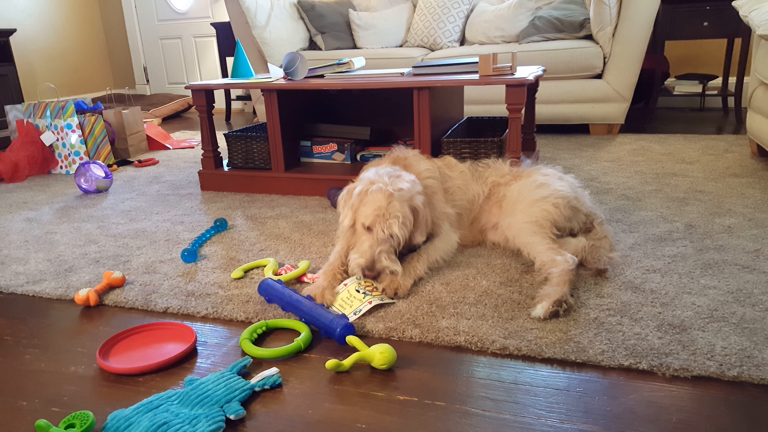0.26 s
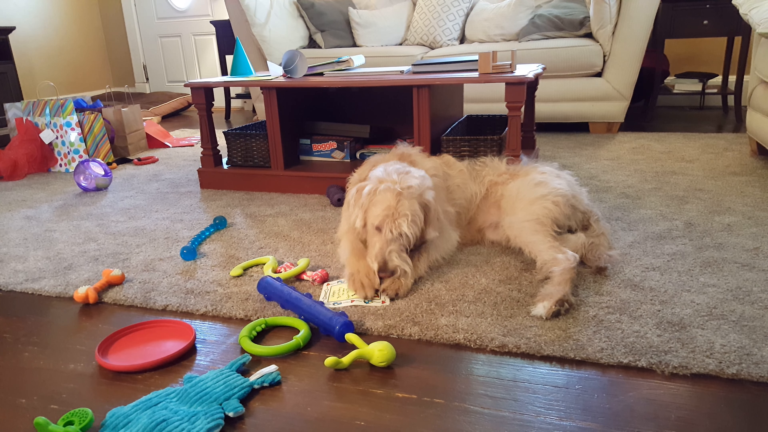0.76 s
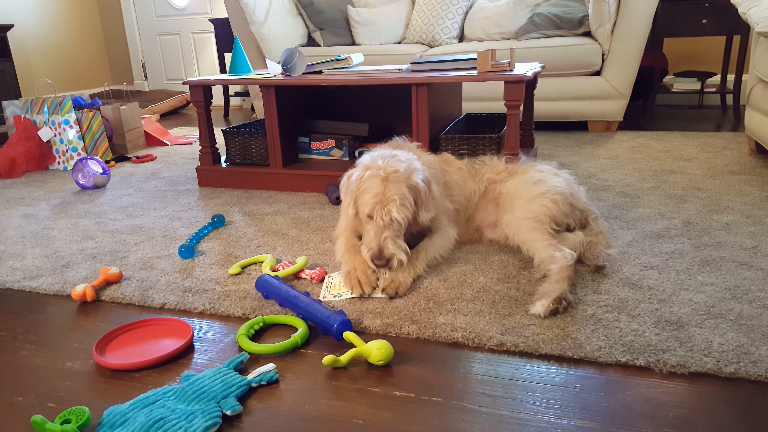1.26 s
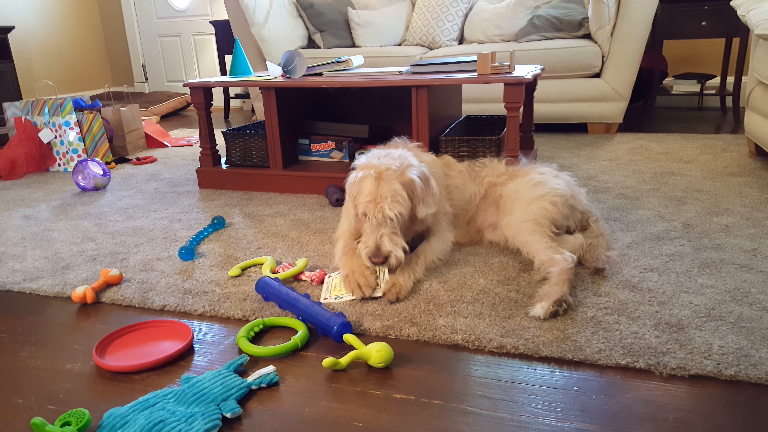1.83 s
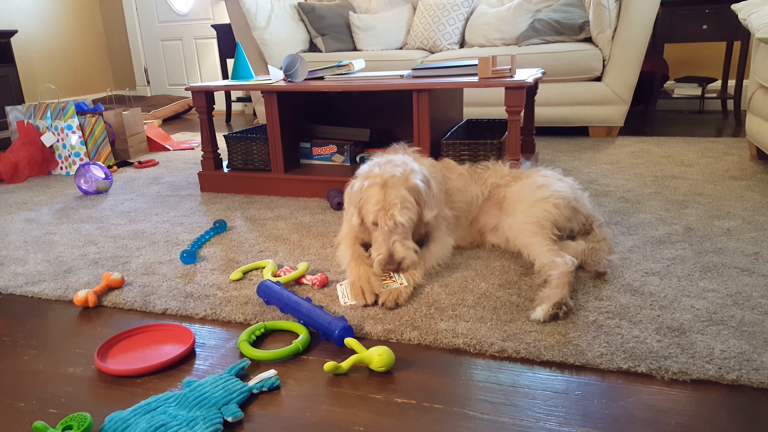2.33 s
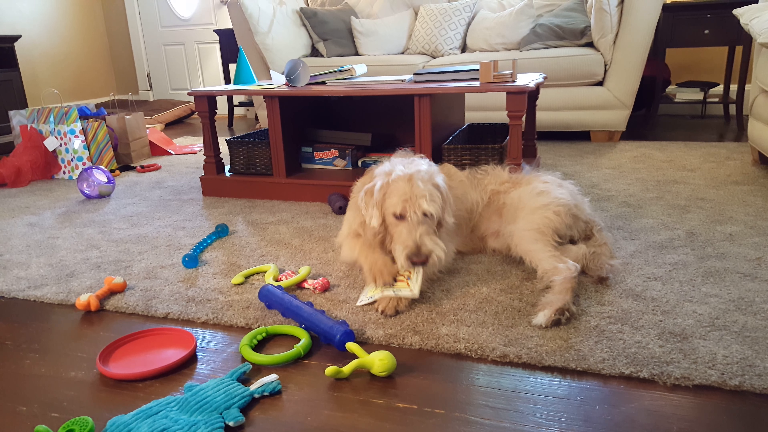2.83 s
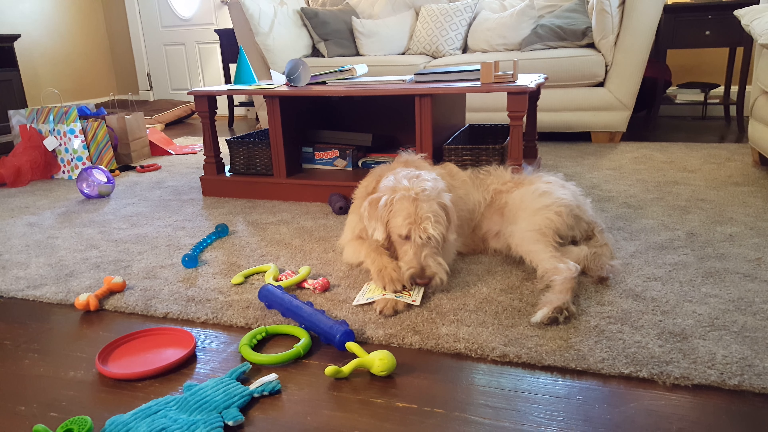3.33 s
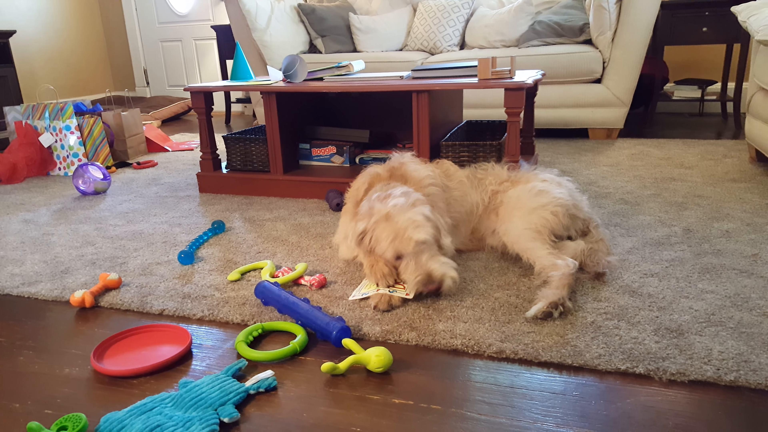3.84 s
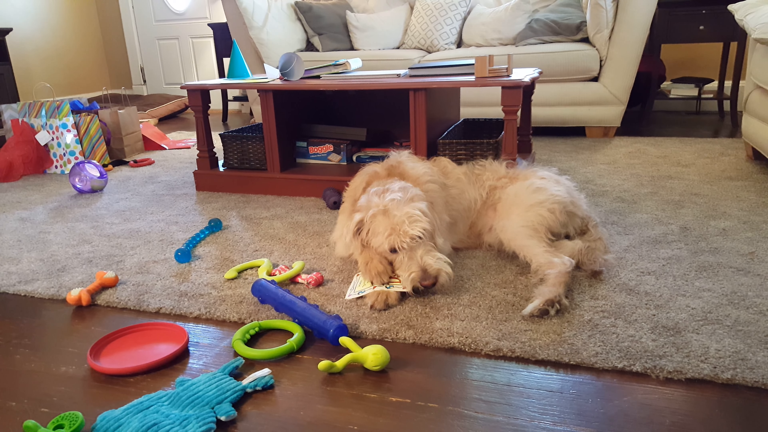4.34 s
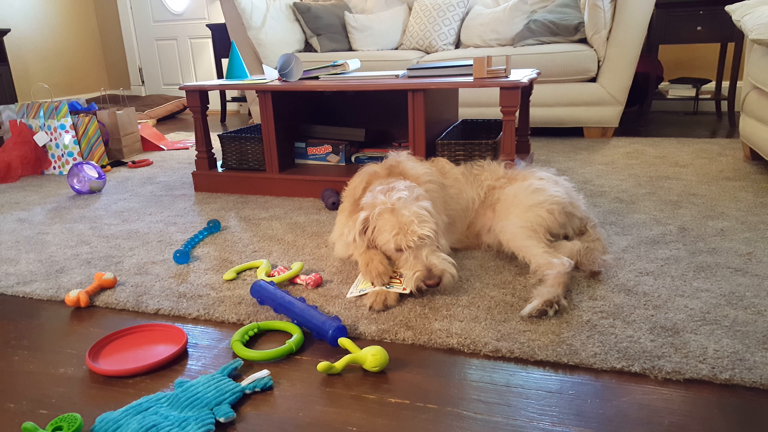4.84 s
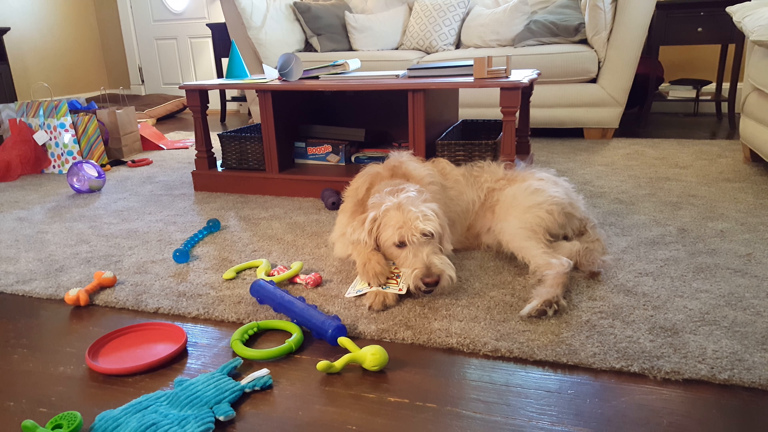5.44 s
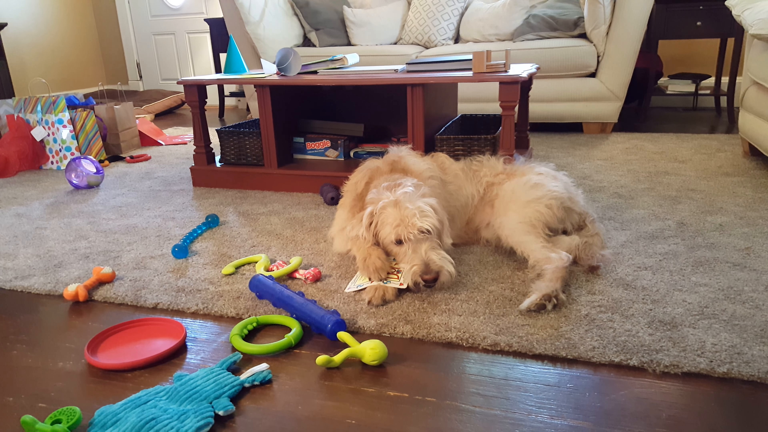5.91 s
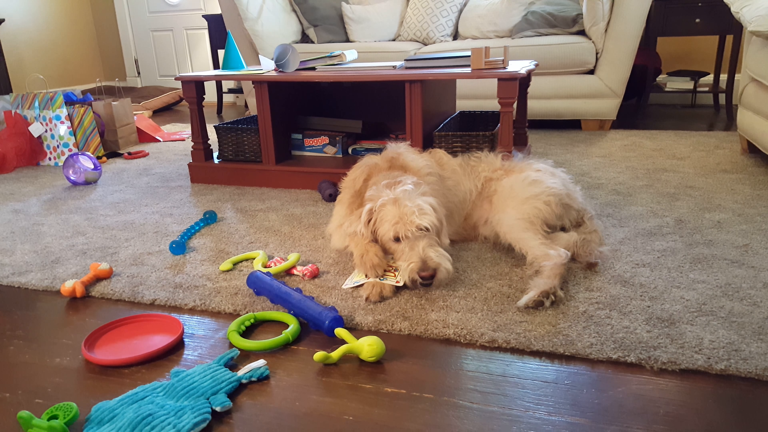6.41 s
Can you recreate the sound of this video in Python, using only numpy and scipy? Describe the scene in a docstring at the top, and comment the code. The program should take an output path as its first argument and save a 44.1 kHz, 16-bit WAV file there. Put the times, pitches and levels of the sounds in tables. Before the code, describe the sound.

Indoors, a dog on a rug works at a stiff paper card, heard slightly left in a small, soft room with short reflections. Muffled outside engines drone low throughout, wavering, over faint room air, left-heavy hiss and a barely audible appliance hum. For the first half second there is little but drone and a tiny wet tick. Crumples and a sharp snap come at 0.5-0.8, with weaker snaps around 1.0-1.1. A low rev climbs from 1.3 and pulses near 1.7 and 2.0. At 2.0 the loudest crack and crumple bursts out. After a lull, crunchy rustles cluster at 2.7-3.1 under a higher engine note. Engine notes waver lower at 3.4-4.7. From 3.9 to the end at about 6.7, small dry snaps, short crinkles and thin lip ticks come irregularly, closer together after 5.4, as the drone dips, then returns near 6.

```python
"""In a living room, a dog lies on a rug, crumpling, snapping and chewing a paper card.
The card is made of thousands of tiny random creases, sharp cracks with short rings, and thin wet mouth ticks.
Small engines outside drone through the walls and stir the room's low modes; an appliance hums faintly.
These are sine tones and ringing noise. Two microphone ports listen over a bed of air and hiss:
the left port lifts the upper middle of the sounds from the dog, and its own hiss is stronger there too."""
import sys
import numpy as np
from scipy import signal
from scipy.fft import rfft, irfft
from scipy.io import wavfile

SR = 44100
rng = np.random.default_rng(int(sys.argv[2]) if len(sys.argv) > 2 else 0)


def file_out(sig):
    """Save sig as 16-bit WAV at sys.argv[1]."""
    # one column per channel
    cols = np.atleast_2d(sig).T
    # limit, then scale
    lim = np.clip(cols, -1, 1)
    pcm = np.round(lim * 32767).astype(np.int16)
    wavfile.write(sys.argv[1], SR, pcm)


N = 294147   # length in samples


def amp(db):
    """Decibels to gain."""
    return 10 ** (np.asarray(db) / 20)


def rms_one(x):
    """Scale a sound to an rms (average strength) of 1."""
    return x / np.sqrt(np.mean(x ** 2) + 1e-20)


def in_time(rows):
    """Draw straight lines between the rows of a table: one curve per column, one value per sample."""
    s, *columns = np.transpose(rows)
    return [np.interp(np.arange(N) / SR, s, column) for column in columns]


def at_hz(points, hz):
    """Read a table of pitch and value at any pitch, on a log-frequency axis."""
    table_hz, values = np.array(points).T
    return np.interp(np.log(hz + 1), np.log(table_hz), values)


def colour(x, points):
    """Give a sound the dB spectrum of a table, with a filter that never sounds early (minimum phase)."""
    log_gain = np.log(amp(at_hz(points, np.linspace(0, SR / 2, 1025))))
    cepstrum = irfft(log_gain)
    # folding the second half onto the first makes the filter causal
    cepstrum[1:1024] *= 2
    cepstrum[1025:] = 0
    response = irfft(np.exp(rfft(cepstrum)))
    return signal.oaconvolve(x, response)[:N]


def drift(rate_hz):
    """Slow random wandering around 0 with a spread of about 1."""
    r = np.exp(-80 * np.pi * rate_hz / SR)   # made at one value every 40 samples
    noise = rng.standard_normal(N // 40 + 2002)
    slow = signal.lfilter([1], [1, -2 * r, r * r], noise)[2000:]   # skip the filter's start
    return np.interp(np.arange(N) / 40, np.arange(len(slow)), rms_one(slow))


def resonance(x, hz, width_hz):
    """Two-pole band-pass: sound near one pitch rings on, with a gain of 1 at the top."""
    r = np.exp(-np.pi * width_hz / SR)
    gain = (1 - r * r) / 2
    return signal.lfilter(np.array([1, 0, -1]) * gain, [1, -2 * r * np.cos(2 * np.pi * hz / SR), r * r], x)


def butter_filter(x, order, hz, kind):
    """Keep only the low, high or middle part of a sound."""
    return signal.sosfilt(signal.butter(order, hz, kind, fs=SR, output="sos"), x)


def panned(x, db):
    """Mono to left and right, with the left louder by this many dB."""
    return x * amp([[db / 2], [-db / 2]])


def tone(hz, db, waver_db):
    """A sine that follows a pitch curve while its level wavers."""
    phase = 2 * np.pi * np.cumsum(hz) / SR + rng.uniform(0, 2 * np.pi)
    return np.sqrt(2) * amp(db + waver_db * drift(8.2)) * np.sin(phase)   # sqrt(2): db counts as rms


def swells(peak_s, rise_s, fall_s, db):
    """Bell-shaped swells, each with its own rise and fall, summed in power."""
    power = np.zeros(N)
    for peak, rise, fall, gain in zip(peak_s, rise_s, fall_s, amp(db)):
        first = max(0, round((peak - 4 * rise) * SR))
        last = min(N, round((peak + 4 * fall) * SR))
        near = np.arange(first, last)
        since = near / SR - peak
        power[near] += gain ** 2 * np.exp(-(since / np.where(since < 0, rise, fall)) ** 2)
    return np.sqrt(power)


# Tone colour of the air and hiss, as a relative spectrum: pitch_hz, level_db
AIR_COLOUR = [(15, -31), (25, -17), (43, -16), (86, -4.5), (140, -1.5), (247, -17), (283, -9.5), (370, -10),
              (602, -22.5), (1030, -15.5), (1590, -19.5), (2510, -8.5), (4300, -28), (9660, -40),
              (15700, -37)]
# How much stronger the left port is than the right: pitch_hz, difference_db
AIR_BALANCE = [(30, -6), (60, 4), (110, -3), (200, 10), (380, -0.5), (700, 12.5), (1290, 12.5),
               (2380, 24.5), (4400, 7.5), (8120, 2), (15000, -1.5)]
# How alike the two ports are; 1 is the same, and 0 or less is played as unrelated: pitch_hz, likeness
AIR_LIKENESS = [(60, 0), (130, 1.3), (290, 0.9), (640, 0.68), (1410, -0.27), (3100, -0.08), (6820, -0.44),
                (15000, 0)]
AIR_LEVEL_DB = -60.5   # of the two ports averaged, counted above 250 Hz


def air_and_hiss(patchy_db=0.32):
    """Room air is noise shared by both ports; hiss is noise that each port has on its own."""
    hz = np.fft.rfftfreq(N, 1 / SR)
    common, left, right = rfft(rng.standard_normal((3, N)))
    alike = np.clip(at_hz(AIR_LIKENESS, hz), 0, 1)
    pan_db = at_hz(AIR_BALANCE, hz) / 2 * [[1], [-1]]
    both = np.sqrt(alike) * common + np.sqrt(1 - alike) * np.array([left, right])
    both = both * amp(pan_db)
    # divide out a level for the sum of both ports
    mid = np.sqrt(np.mean(amp(2 * pan_db), axis=0) / 2 + np.sqrt(alike) * alike / 2)
    noise = irfft(both * amp(at_hz(AIR_COLOUR, hz)) / mid, N)
    above_bass = irfft(rfft(noise.mean(axis=0)) * (hz > 250), N)
    return amp(AIR_LEVEL_DB + patchy_db * drift(15)) * noise / np.std(above_bass)


# Steady note of the appliance: pitch_hz, level_db (rms around which it wavers, before panning)
HUM_TONES = [(236.9, -72.5)]


def appliance_hum():
    """A faint sine at a fixed pitch, wavering slightly in level."""
    return sum(tone(np.full(N, hz), db, waver_db=0.42) for hz, db in HUM_TONES)


# Overtones of the steady engine: multiple of the firing rate, level_db (against the engine)
ENGINE_ORDERS = [(1, -23), (2, -0.5), (3, -9.5), (4, -16)]
# Notes of the revving engine, one list for each stretch that is heard: time_s, pitch_hz, level_db
REV_STRETCHES = [
    [(0.5, 120.0, -61), (0.7, 119.4, -58), (0.95, 119, -57)],
    [(1.3, 98.5, -63), (1.6, 118.8, -56), (1.7, 133.3, -44), (1.88, 135.4, -79), (1.98, 135.6, -43.5),
     (2.2, 138.2, -69)],
    [(2.56, 168.8, -61.5), (2.85, 166, -64), (3.1, 171, -55.5), (3.36, 169.6, -58.5)],
    [(3.41, 110.5, -52), (3.74, 124.1, -58), (4.1, 117, -51.5), (4.22, 137.6, -52), (4.3, 142.7, -71),
     (4.43, 143, -51), (4.75, 103, -67)],
]
# Low notes at which the room rings: pitch_hz, width_hz, level_db (added to the drone curves below)
LOW_MODES = [(91.5, 37, 7), (135.54, 2.8, -1.5), (180, 34, -1)]
# Strength of the drone: time_s, steady_engine_db, broad_rumble_db, upper_room_mode_db
DRONE_LEVELS = [(0.0, -56, -67.5, -59), (0.97, -57, -74, -60.5), (1.49, -61.5, -67.5, -62.5),
                (2.01, -55, -58, -47), (2.23, -69, -71.5, -60), (2.69, -67.5, -81, -74),
                (3.01, -56.5, -76, -58), (3.19, -62.5, -68, -77), (3.29, -52, -64, -54),
                (3.53, -51, -65, -57), (3.6, -58.5, -66, -60.5), (4.01, -56.5, -73, -64),
                (4.23, -51, -56.5, -47.5), (4.98, -66, -82.5, -72), (5.74, -70.5, -69, -67),
                (5.98, -51.5, -73, -55), (6.54, -51, -65, -66), (6.67, -51, -66, -69)]
SECOND_ORDER_HZ, WANDER_HZ = 97.3, 0.816   # steady engine's second order, and how far it strays


def engines():
    """Firing pulses make a stack of sines, revs make a gliding note, and rumble rings in the room's modes."""
    steady_db, rumble_db, upper_db = in_time(DRONE_LEVELS)
    firing_hz = (SECOND_ORDER_HZ + WANDER_HZ * drift(1.59)) / 2
    out = sum(tone(k * firing_hz, steady_db + order_db, waver_db=1.27) for k, order_db in ENGINE_ORDERS)
    for rows in REV_STRETCHES:
        (start_s, first_hz, _), (end_s, last_hz, _) = rows[0], rows[-1]
        fade_in = (start_s - 0.1, first_hz, -100)
        fade_out = (end_s + 0.033, last_hz, -100)
        out = out + tone(*in_time([fade_in, *rows, fade_out]), waver_db=2.7)
    for db, (hz, width_hz, mode_db) in zip((rumble_db, upper_db, rumble_db), LOW_MODES):
        ringing = resonance(rng.standard_normal(N), hz, width_hz)
        ringing = resonance(ringing, hz, 2.1 * width_hz)
        out = out + amp(db + mode_db) * rms_one(ringing)
    return out


# Thin wet ticks of lips and tongue: start_s, click_db (height of the click before its resonance)
MOUTH_TICKS = [(0.038, -64), (2.318, -60), (3.3672, -56), (3.895, -55), (4.181, -59), (4.632, -64),
               (4.6786, -63), (4.8294, -63), (5.4564, -54), (5.4759, -54), (5.7019, -60), (6.1234, -66),
               (6.2127, -60)]


def mouth_ticks(hz=11500, width_hz=5000):
    """Each tick is a one-sample click through a wide, high resonance, applied twice."""
    clicks = np.zeros(N)
    for s, db in MOUTH_TICKS:
        clicks[round(s * SR)] = amp(db)
    ringing = resonance(resonance(clicks, hz, width_hz), hz, width_hz)
    return panned(6 * ringing, 0.1)


# Body of the rustle, as a relative spectrum: pitch_hz, level_db
CARD_BODY = [(350, -32), (600, -29), (841, -6), (1280, -8), (2140, -3), (3160, -2), (4500, -20.5),
             (5850, -61), (9900, -120)]
# Treble of the rustle, as a relative spectrum: pitch_hz, level_db
CARD_CRISP = [(2060, -35), (3500, -8), (3660, 2.5), (6440, 1.5), (9500, -12), (12400, -56), (20900, -120)]
# Crumples and snuffles at the card, plus two swells right after the loudest snaps # (tilt is upper body against
# lower body): # peak_s, length_s, body_db, tilt_db, treble_db, bulk_db
CRUMPLES = [ (0.507, 0.034, -59.5, 1, -58.5, -74), (0.684, 0.04, -50, -15.5, -61, -64),
            (0.764, 0.056, -60, -11, -67, -64), (0.826, 0.032, -54, -16.5, -61.5, -64),
            (1.04, 0.032, -72, -9, -72, -67), (1.153, 0.13, -72, -7, -79, -75),
            (2.001, 0.041, -42, -4.5, -56, -58), (2.658, 0.067, -60.5, -9, -69.5, -73),
            (2.69, 0.016, -49, 10.5, -68, -83), (2.705, 0.043, -68, 0, -58.5, -87),
            (2.874, 0.037, -47, 3, -59, -72), (2.987, 0.05, -45, -7, -62.5, -84),
            (3.109, 0.055, -50, -8, -63, -59), (3.37, .02, -77, 5, -70, -91),
            (3.518, 0.054, -82, -12, -83, -72.5), (3.913, 0.017, -61.5, -6, -73.5, -75),
            (4.182, 0.039, -64.5, 4, -78, -68.5), (4.367, 0.051, -61.5, -4, -73, -60.5),
            (4.492, 0.049, -64, 3, -69.5, -66.5), (4.639, .015, -60.5, -7, -65, -75),
            (4.834, 0.0082, -54.5, -14, -65, -65), (4.9, .026, -70, -7, -82, -81),
            (5.06, 0.033, -69, -6, -70, -75), (5.471, 0.062, -65, 6, -66.5, -66),
            (5.696, 0.053, -58.5, 1, -66.5, -70), (5.754, 0.024, -67, 1, -64.5, -61),
            (5.865, 0.032, -66.5, 6, -70, -80), (6.052, 0.013, -60.5, 9, -66, -64),
            (6.21, 0.042, -64, 0, -67, -91), (6.409, 0.038, -61, 1, -69.5, -66.5),
            (6.536, 0.07, -70, -2, -73, -95)]
# Faint continuous rustle of the card, slowly swelling and fading: time_s, level_db
FAINT_RUSTLE = [(0.0, -78.5), (0.61, -79), (0.87, -64.5), (1.3, -79.5), (1.76, -76), (1.93, -66),
                (2.49, -80), (2.97, -67), (3.59, -76), (6.67, -74.5)]
RISE_SHARE, TREBLE_LAG_SHARE = 0.37, 0.11   # parts of a crumple's length
AIRY_TOP_DB = -10.5   # against the treble


def rustle(per_s=3000, uneven_db=3.5, clump_db=2.5, split_hz=1900, air_hz=9500):
    """Dense tiny creases, clumped, heard through the card's body, its crisp edge, airy top and dull bulk."""
    peak_s, length_s, body_db, tilt_db, treble_db, bulk_db = np.transpose(CRUMPLES)
    rise_s, fall_s = RISE_SHARE * length_s, (1 - RISE_SHARE) * length_s
    lag_s = TREBLE_LAG_SHARE * length_s
    # four layers of random creases, of uneven size and either sign
    sizes = amp(uneven_db * np.minimum(rng.exponential(1, (4, N)), 4)) * rng.choice([-1, 1], (4, N))
    happens = rng.random((4, N)) < per_s / SR
    creases = sizes * happens * amp(clump_db * drift(47))

    body = rms_one(colour(creases[0], CARD_BODY))
    low_body = butter_filter(body, 3, split_hz, "low")
    high_body = butter_filter(body, 3, split_hz, "high")
    crisp = rms_one(colour(creases[1], CARD_CRISP))
    bulk = rms_one(resonance(resonance(creases[2], 340, 860), 340, 860))
    air = rms_one(butter_filter(creases[3], 4, air_hz, "high"))

    faint = amp(in_time(FAINT_RUSTLE)[0])
    out = low_body * (swells(peak_s, rise_s, fall_s, body_db - tilt_db / 2) + faint)
    out += high_body * (swells(peak_s, rise_s, fall_s, body_db + tilt_db / 2) + faint)
    out += crisp * swells(peak_s + lag_s, rise_s, fall_s, treble_db)
    out += air * swells(peak_s + lag_s / 2, rise_s, fall_s, treble_db + AIRY_TOP_DB)
    out += bulk * (swells(peak_s, rise_s, fall_s, bulk_db) + faint)
    return panned(out, 5.65)


# Snaps of the card and smacks of the mouth (crack_db is its peak before it is dulled):
# time_s (the sound starts onset_delay_s later), crack_db, low_ring_hz, low_ring_db, high_ring_hz, high_ring_db
CARD_SNAPS = [(0.657, -10.5, 796, -42, 1850, -58), (0.817, -32, 1010, -41, 1930, -39),
              (1.011, -36, 383, -42, 2420, -48), (1.115, -46, 520, -46, 1400, -55),
              (1.978, -5, 378, -21.5, 2100, -30), (2.864, -42, 1110, -42, 1840, -36),
              (2.996, -42, 874, -50, 2190, -36), (3.35, -53, 570, -40, 2830, -53),
              (3.867, -32.5, 1010, -43.5, 2000, -44), (4.172, -52, 310, -64, 2280, -41.5),
              (4.346, -35, 749, -41.5, 1500, -42), (4.633, -33, 654, -47, 2410, -36),
              (4.83, -45, 757, -37, 2860, -36.5), (4.838, -44, 810, -44.5, 2860, -40),
              (4.898, -46, 377, -50, 2030, -39), (5.088, -47, 1300, -57, 2120, -49),
              (5.46, -29.5, 1250, -55, 2160, -44), (5.478, -44, 436, -48, 2300, -46),
              (5.538, -50, 320, -48, 2500, -48), (5.698, -32, 625, -40, 2690, -38.5),
              (5.712, -47, 960, -33.5, 2920, -52), (5.859, -47, 726, -46, 1630, -41.5),
              (6.145, -36, 1230, -43, 1500, -46), (6.218, -45, 1170, -47, 2260, -48.5),
              (6.418, -41, 840, -45, 2280, -43.5), (6.449, -42, 900, -58, 2610, -46),
              (6.465, -46, 900, -58, 2000, -44.5), (6.56, -34, 729, -56, 2720, -40.5),
              (6.59, -40, 1510, -51, 2730, -49)]
# Tone colour of a crack, as a relative spectrum: pitch_hz, level_db
CRACK_COLOUR = [(200, -6), (500, -2.5), (1200, 4.5), (2500, 3.5), (4000, 3), (6000, -1), (9000, -7),
                (15000, -12)]
RING_T60_S = 0.012   # time for the pocket's ring to die by 60 dB
FULL_SCALE_DULL, DULL_PER_DB = 0.39, 0.0095   # dullness (0-1) of a 0 dB crack, and growth per dB weaker


def snaps(onset_delay_s=0.00065, rise_s=0.00017):
    """A pull-then-push crack, and two brief rings of the pocket it happens in."""
    length = 2048   # samples
    out, t = np.zeros(N + length), np.arange(length) / SR
    click = (t == 0) * 1.0
    crack = -colour(click, CRACK_COLOUR)[:length]
    crack = crack / np.max(np.abs(crack))
    dying = (1 - np.exp(-t / rise_s)) * amp(-60 * t / RING_T60_S)
    for s, db, low_hz, low_db, high_hz, high_db in CARD_SNAPS:
        dull = np.clip(FULL_SCALE_DULL - DULL_PER_DB * db, 0, 0.9)   # weaker snaps are duller
        dulled = signal.lfilter([(1 - dull) ** 2], [1, -2 * dull, dull ** 2], crack)
        rings = amp(low_db) * np.sin(2 * np.pi * low_hz * t)
        rings += amp(high_db) * np.sin(2 * np.pi * high_hz * t)
        i = round((s + onset_delay_s) * SR)
        out[i:i + length] += amp(db) * dulled + dying * rings
    return panned(out[:N], 4)


# First wall echoes: delay_s, left_db, right_db
WALL_ECHOES = [(.0022, -16.5, -12), (0.01, -7.5, -47), (0.0148, -5, -0.5), (.018, -17, -5),
               (0.0238, -25, -36)]
# Time for the tail to die by 60 dB: pitch_hz, time_s
TAIL_T60 = [(150, 0.45), (1000, 0.38), (4000, 0.35), (12000, 0.3)]
TAIL_DB, ECHO_DULL = -5.5, 0.83   # energy of the tail's response; dullness (0-1) of the echoes
TAIL_TILT_DB = -1.5   # per octave: soft furnishings swallow the treble before it is scattered


def room(x):
    """Direct sound, first wall echoes and a diffuse tail that dies faster in the treble."""
    t = np.arange(SR // 2) / SR
    noise = rng.standard_normal((3, len(t)))
    tail, edges = 0, 100 * 2.0 ** np.arange(8)
    for low, high in zip(edges, np.minimum(2 * edges, 0.45 * SR)):
        hz = np.sqrt(low * high)
        alike = np.clip(1 - hz / 1800, 0, 1)   # close ports hear the same bass
        band = butter_filter(noise, 2, [low, high], "band")
        band = np.sqrt(alike) * band[0] + np.sqrt(1 - alike) * band[1:]
        tail = tail + band * amp(TAIL_TILT_DB * np.log2(hz / 1000) - 60 * t / at_hz(TAIL_T60, hz))
    tail = tail * (1 - np.exp(-t / 0.0016))   # soft start
    response = amp(TAIL_DB) * tail / np.sqrt(np.sum(tail ** 2, axis=1, keepdims=True))
    soft = (1 - ECHO_DULL) * ECHO_DULL ** np.arange(64)   # furniture returns little treble
    for s, left_db, right_db in WALL_ECHOES:
        i = round(s * SR)
        response[:, i:i + 64] += amp([[left_db], [right_db]]) * soft
    mono = x.mean(axis=0, keepdims=True)
    return x + signal.oaconvolve(mono, response, axes=1)[:, :N]


LEFT_LAG = 4   # samples by which sound from the dog reaches the left port later


def ports(x, cavity_hz=2400, width_hz=1500, lift_db=6, shade_db=-5):
    """The left port hears a little late and its cavity lifts the upper middle; the right is shaded there."""
    cavity = resonance(x, cavity_hz, width_hz)
    left, right = x + cavity * np.array([[amp(lift_db) - 1], [amp(shade_db) - 1]])
    return np.array([np.pad(left, (LEFT_LAG, 0))[:N], right])


def scene():
    """Card and mouth in the room, drone and hum around them, air and hiss beneath."""
    background = air_and_hiss() + panned(appliance_hum() + engines(), 1.84)
    # a small sheet radiates no deep bass
    card = butter_filter(mouth_ticks() + rustle() + snaps(), 4, 270, "high")
    return background + ports(room(card))


def record(dry):
    """Cut the top steeply: everything above 15950 Hz falls by at least 60 dB."""
    return signal.sosfilt(signal.cheby2(20, 60, 15950, fs=SR, output="sos"), dry)


dry = scene()
out = record(dry)
file_out(out)
```